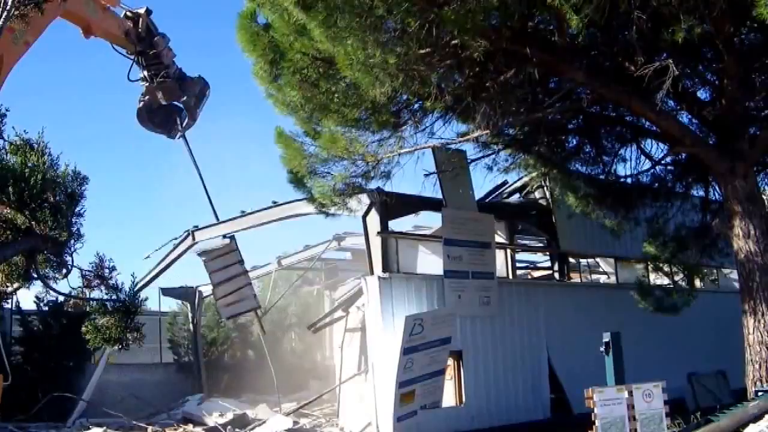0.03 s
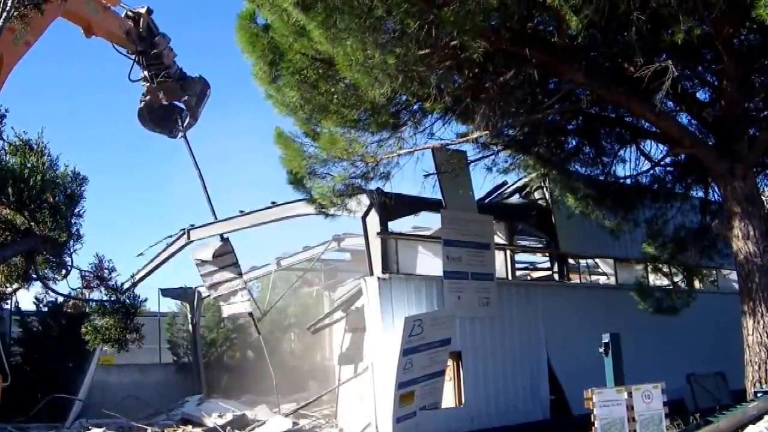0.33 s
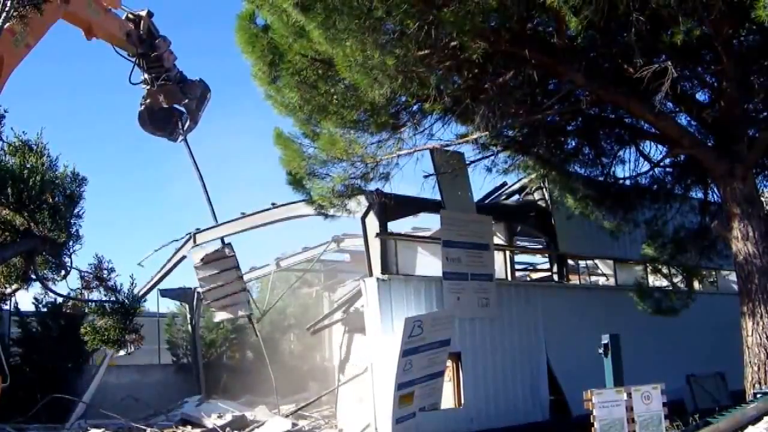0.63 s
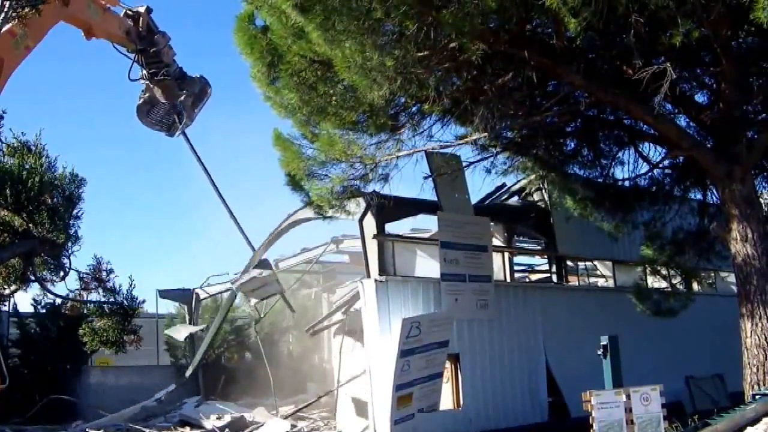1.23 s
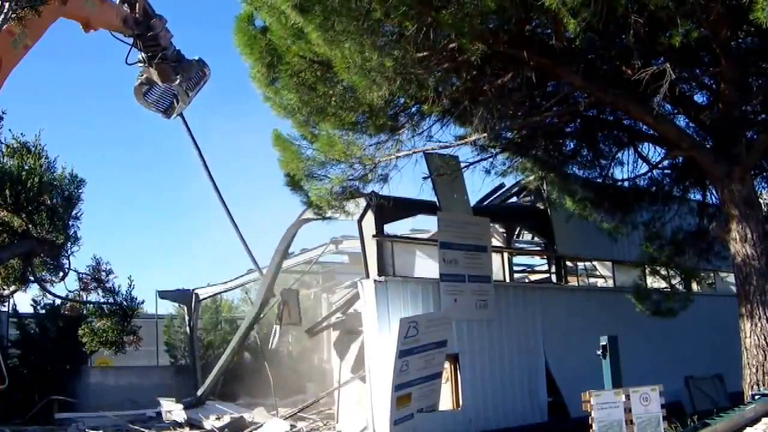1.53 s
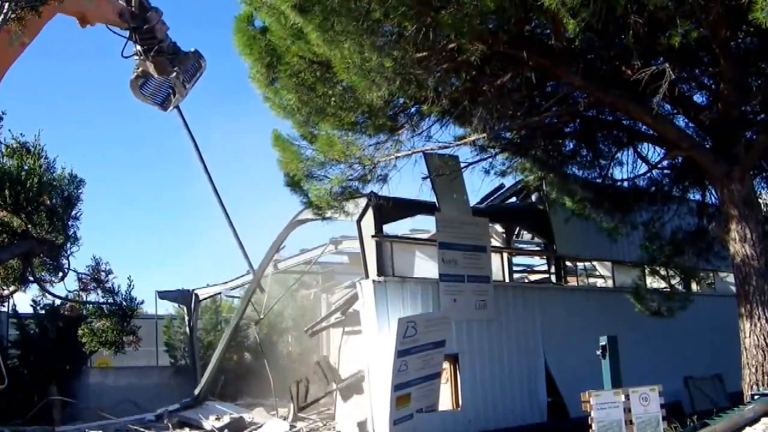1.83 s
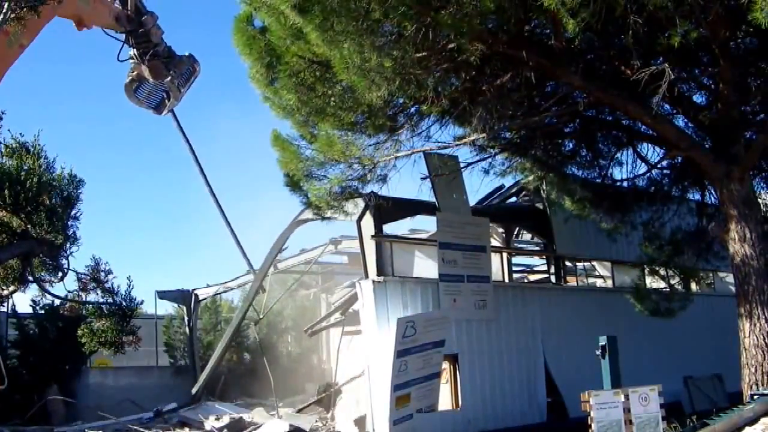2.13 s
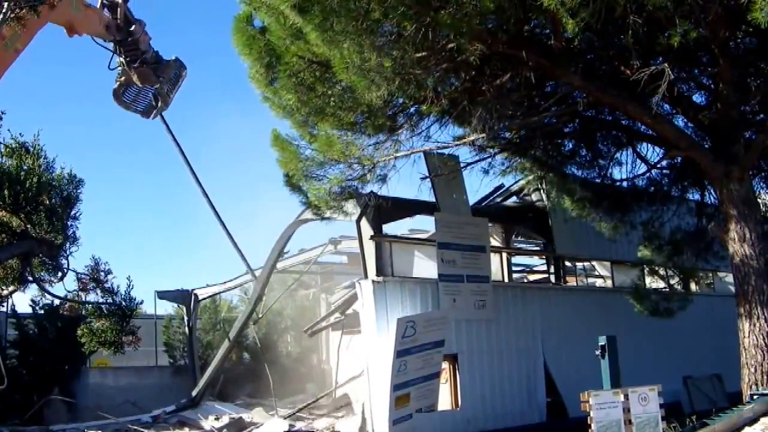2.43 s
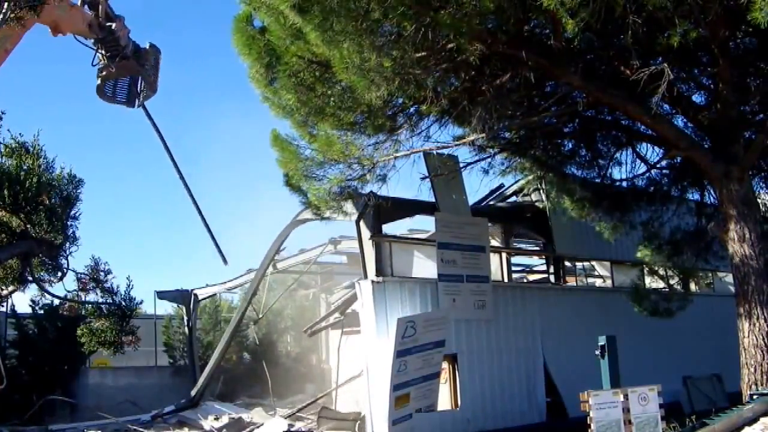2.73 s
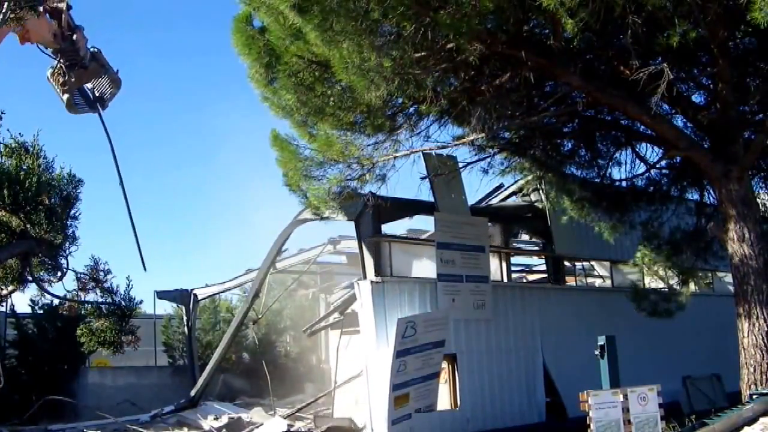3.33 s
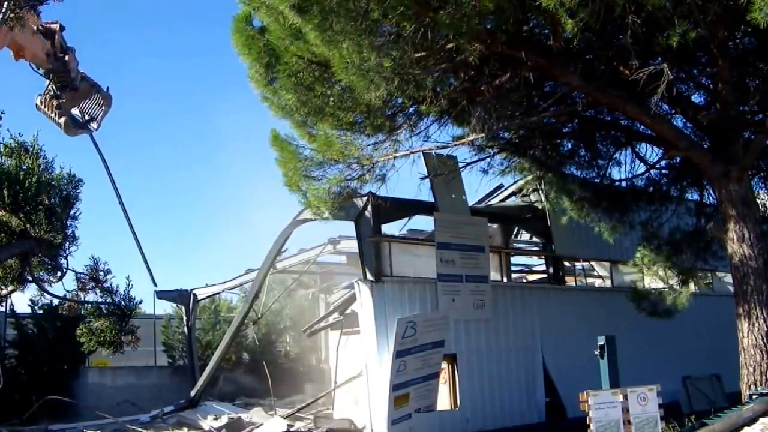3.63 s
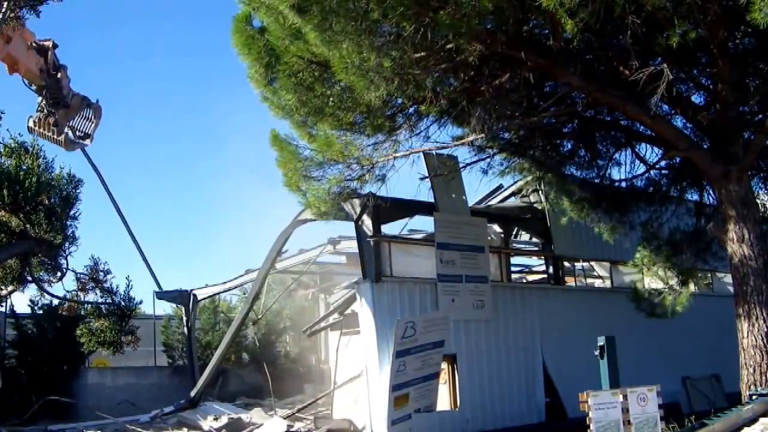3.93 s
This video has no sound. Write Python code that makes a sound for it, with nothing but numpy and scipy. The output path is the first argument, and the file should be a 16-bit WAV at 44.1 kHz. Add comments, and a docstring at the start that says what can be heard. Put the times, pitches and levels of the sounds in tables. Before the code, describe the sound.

An excavator tears down a shed outdoors, its diesel engine roaring under a hydraulic whine. Sheeting and rubble crash and clatter, heaviest midway, with brief steel squeals, then thin out. A small camera microphone picks up short echoes.

```python
"""A diesel roars under the whine of its hydraulic pump: an excavator is pulling the steel frame off a shed,
outdoors. Rubble pours down as thousands of tiny knocks, sheeting and masonry crash in bursts of fragments,
brittle pieces snap, and steel squeals where it drags and rings where it is struck. The collapse echoes
round the yard. A small camera microphone colours everything; its gain control ducks the engine at the
loud crashes and lets it swell back slowly."""
import sys
import numpy as np
from scipy import signal
from scipy.fft import rfft, irfft
from scipy.io import wavfile
from scipy.ndimage import uniform_filter1d

SR = 44100
rng = np.random.default_rng(int(sys.argv[2]) if len(sys.argv) > 2 else 0)


def wav_out(sig):
    """Save sig, one row per channel (or a flat mono array), as 16-bit PCM at SR to the path in sys.argv[1]."""
    wavfile.write(sys.argv[1], SR, np.round(np.clip(np.atleast_2d(sig).T, -1, 1) * 32767).astype(np.int16))


N = 176400
T = np.arange(N) / SR
CYCLE_HZ, SPEED_WANDER = 50.28, 0.0029  # engine cycle rate and its relative wander


def amp(db):
    """Decibels to gain."""
    return 10 ** (np.asarray(db) / 20)


def unit(x):
    """Scales to rms 1."""
    return x / np.sqrt(np.mean(x ** 2) + 1e-20)


def at_hz(points, hz):
    """Reads a curve on a log-frequency axis."""
    f, value = np.transpose(points)
    return np.interp(np.log(hz + 1), np.log(f + 1), value)


def fader(points):
    """Level in dB across the scene, ramping from point to point."""
    return np.interp(T, *np.transpose(points))


def add(mix, s, sound):
    """Mixes a sound in at s seconds."""
    part = mix[max(round(s * SR), 0):][:len(sound)]
    part += sound[:len(part)]


def colour(x, eq, size=4096):
    """Minimum-phase EQ of unit energy: the curve sets the tone, its levels are only relative."""
    log_gain = np.log(amp(at_hz(eq, abs(np.fft.fftfreq(size, 1 / SR)))))
    taps = np.fft.ifft(np.exp(np.conj(signal.hilbert(log_gain)))).real[:size // 2]
    return signal.oaconvolve(x, taps / np.linalg.norm(taps))[:len(x)]


def drift(hz):
    """Slow random modulation of rms 1, up to the given rate."""
    rolloff = 1 + (np.fft.rfftfreq(N, 1 / SR) / hz) ** 4
    return unit(irfft(rfft(rng.standard_normal(N)) / rolloff, N))


def diesel(phase, firing_depth=0.027, drone_hz=101):
    """A fluttering roar that pulses faintly with the firings, over engine orders and a low drone."""
    # tone of the roar: f/Hz, level/dB
    roar_eq = [(25, 9), (60, 13), (130, 6.5), (300, 7), (500, 9.5), (830, 4.5), (1200, -1), (2500, -1.5),
               (4300, -1), (7000, -0.5), (11000, 1.5), (16000, 0.5)]
    # engine harmonics: multiple of the cycle rate, level/dB
    orders = [(3, -69.5), (5, -39.5), (6, -37.5), (9, -46.5), (11, -52), (12, -41), (14, -42), (20, -45.5),
              (24, -46.5)]
    firing = rng.standard_normal(N) * (1 + firing_depth * np.cos(2 * phase))
    roar = colour(firing, roar_eq) * amp(-16.5 + 0.3 * drift(hz=35))
    hum = sum(amp(db + 2 * drift(hz=6.2)) * np.sin(order * phase + 2 * np.pi * rng.random())
              for order, db in orders)
    drone = amp(-24.5 + drift(hz=13)) * np.sin(phase * drone_hz / CYCLE_HZ)
    return roar + np.sqrt(2) * (hum + drone)


def pump(phase, order=10):
    """The hydraulic pump whines at a multiple of the engine's rate, swelling and flickering."""
    # swell of the whine: t/s, level/dB
    swell = [(0, -25.5), (.45, -37), (.78, -26), (1.1, -33.5), (1.9, -30.5), (2.3, -28), (2.85, -31.5),
             (3.5, -36), (4, -33)]
    return np.sqrt(2) * amp(fader(swell) + 2.2 * drift(hz=37)) * np.sin(order * phase)


def whistle(hz, width_hz):
    """Noise in a narrow resonance that follows a pitch curve."""
    r = np.exp(-np.pi * width_hz / SR)
    noise = rng.standard_normal(N) + 1j * rng.standard_normal(N)
    waver = signal.lfilter([1], [1, -2 * r, r * r], noise)[-len(hz):]
    return unit((waver * np.exp(2j * np.pi * np.cumsum(hz) / SR)).real)


def valve(hz=4170):
    """A hydraulic valve whistles thinly on one pitch."""
    # swell of the whistle: t/s, level/dB
    swell = [(0, -35), (3.2, -39), (3.62, -32), (3.85, -43.5), (4, -43)]
    return amp(fader(swell)) * whistle(np.full(N, hz), width_hz=45)


def fragments(per_s, count=48, size=1536, spread_db=3.5, ring_t60=0.031, crunch_s=0.0016):
    """A dense train of knocks of uneven size, each on one of many pieces that crunch and ring briefly."""
    strength = amp(spread_db * np.minimum(rng.exponential(1, N), 5))
    knocks = strength * rng.choice([-1, 1], N) * (rng.random(N) < per_s / SR)
    piece = rng.integers(0, count, N)
    out, t = np.zeros(N), T[:size]
    for k in range(count):
        hz = 450 * 16 ** rng.random((4, 1))  # four modes within four octaves
        ring = (np.sin(2 * np.pi * hz * t) * np.sqrt(hz)).sum(0) * amp(-60 * t / ring_t60)
        crunch = rng.standard_normal(size) * np.exp(-t / crunch_s)
        grain = 0.52 * ring / np.linalg.norm(ring) + 0.45 * crunch / np.linalg.norm(crunch)
        grain[0] += .5  # contact click
        out += signal.oaconvolve(knocks * (piece == k), grain)[:N]
    return unit(out)


def rubble():
    """Small debris pours down in clumps."""
    # surges of the pour: t/s, level/dB
    pour = [(0, -22), (.18, -25), (.33, -14), (.44, -15), (.6, -20), (.78, -21.5), (1.0, -15),
            (1.13, -22.5), (1.24, -17), (1.3, -18.5), (1.42, -13), (1.55, -2), (1.7, -8.5), (1.87, -4.5),
            (2.05, -11), (2.18, -7.5), (2.3, -9), (2.42, -11), (2.58, -22.5), (2.82, -17), (3.2, -37.5),
            (3.75, -28.5), (3.9, -21)]
    # tone of the debris: f/Hz, level/dB
    debris_eq = [(30, -3), (150, -5.5), (400, -4.5), (800, 0), (1200, 0.5), (1900, 0), (3200, 3),
                 (4500, 2.5), (7000, 1.5), (11000, 3), (16000, 4.5)]
    return colour(fragments(per_s=3200), debris_eq) * amp(fader(pour) + 2 * drift(hz=34.6))


def crashes(size=11025, rise_s=0.0018, fall_s=.011, weight_hz=600, bright_hz=3420):
    """Each crash is a crack and a burst of fragments that holds and dies; heavy pieces sound lower."""
    # sheeting and masonry coming down: t/s, level/dB, hold/s, weight/dB, brightness/dB
    hits = [(.195, -13.5, 0.031, 6.5, 1.5), (.301, -7.5, 0.034, -2, -6), (0.359, -5.5, 0.024, -1, -3.5),
            (0.405, -6.5, 0.028, 1.5, -2.5), (0.849, -7.5, 0.017, 6, -7), (.899, -12, 0.0054, -2, 0),
            (.992, -18, .015, 7, 16), (1.085, -14.5, 0.005, 0, 13), (1.162, -4, 0.011, 6.5, -3.5),
            (1.183, -4.5, 0.015, 4.5, -2.5), (1.235, -11, 0.034, 7.5, -6), (1.338, -10.5, .012, -5, -4),
            (1.352, -5, 0.015, -1, -2.5), (1.374, -11, .008, -3, -20.5), (1.435, -10, 0.0097, 0, -6),
            (1.457, -2.5, .014, 8.5, -8), (1.482, -3, 0.021, 8, 2), (1.526, -5, 0.039, 12.5, 19),
            (1.612, -5, 0.0089, 14, -2), (1.653, -2, 0.018, 5, 3.5), (1.742, -4.5, .005, 3, -1),
            (1.761, 7, 0.0083, 4, 1.5), (1.801, -1.5, 0.035, -11, 4), (1.856, -2.5, 0.0043, -6, -17),
            (1.91, 7, 0.0093, -14, -4), (1.923, 7, 0.03, -12.5, 2), (1.967, 1, 0.009, 3, 2),
            (2.103, -3.5, 0.006, -1, 11), (2.132, -1.5, 0.0035, 12, 5), (2.24, -5, 0.037, 2, 7),
            (2.278, -5, 0.031, -4, 12), (2.349, -10, 0.037, 9, 10), (2.438, -8.5, .012, -3, 4),
            (2.468, -11, 0.0072, 1, 11), (2.697, -6, 0.022, 3, 2.5), (2.719, -7, 0.033, 0.5, 4),
            (3.832, -11, 0.015, -1, -2)]
    # tone of the sheeting: f/Hz, level/dB
    sheeting_eq = [(30, -14), (150, -13.5), (400, -1.5), (800, -2), (1400, 1), (2500, 3), (4200, 1.5),
                   (5600, 5), (7000, -0.5), (11000, 4), (16000, -13)]
    out, t, breakage = np.zeros(N), T[:size], fragments(per_s=5000)
    lowpass = signal.butter(4, 5000, fs=SR, output="sos")
    for s, db, hold_s, weight_db, bright_db in hits:
        envelope = np.minimum(t / rise_s, 1) * np.exp(-np.maximum(t - hold_s, 0) / fall_s)
        burst = breakage[rng.integers(N - size):][:size] * envelope
        burst[round(rise_s * SR / 2)] += 6.8  # the crack, halfway up the attack
        weight = [(weight_hz / 2, weight_db / 2), (weight_hz, weight_db), (2 * weight_hz, 0)]
        sheen = [(bright_hz / 2, 0), (bright_hz, bright_db),
                 (1.73 * bright_hz, bright_db), (3 * bright_hz, 0)]
        burst = colour(colour(burst, sheeting_eq), weight + sheen)
        body = signal.sosfilt(lowpass, burst)  # the body sets the level, the top end rides on it
        body_rms = np.sqrt(np.sum(body ** 2) / SR / (hold_s + fall_s / 2))
        add(out, s, amp(db) * burst / (2 * body_rms))
    return out


def snaps(size=2205, rise_s=0.0052, band_hz=(6100, 10600)):
    """Short, bright cracks of brittle board and glass."""
    # pieces snapping: t/s, level/dB ahead of the band-pass
    cracks = [(0.214, -8), (1.161, -10), (1.433, -6), (1.653, 4), (2.132, -13), (2.295, 5), (2.346, -3),
              (2.381, -5), (2.437, -2), (2.699, -4), (3.831, -4.5)]
    out, t = np.zeros(N), T[:size]
    bandpass = signal.butter(2, band_hz, "band", fs=SR)
    envelope = t / rise_s * np.exp(1 - t / rise_s)
    for s, db in cracks:
        add(out, s, amp(db) * signal.lfilter(*bandpass, rng.standard_normal(size) * envelope))
    return out


def squeals():
    """The frame drags, steel on steel, in short squeals that fall in pitch."""
    # drags: t/s, length/s, start f/Hz, end f/Hz, level/dB
    drags = [(0.406, 0.03, 5500, 4900, -11.5), (.89, .19, 1847, 1760, -26.5), (1.224, .05, 1500, 1250, -31),
             (1.528, 0.22, 4045, 3590, -17)]
    out = np.zeros(N)
    for s, length, from_hz, to_hz, db in drags:
        progress = np.linspace(0, 1, int(length * SR))
        arch = np.sqrt(4 * progress * (1 - progress))
        add(out, s, amp(db) * arch * whistle(from_hz + (to_hz - from_hz) * progress, width_hz=170))
    return out


def clanks():
    """Struck steel parts ring in fast-dying modes."""
    # strikes: t/s, modes as (f/Hz, level/dB, t60/s)
    strikes = [(.899, [(1824, -5, 0.052)]), (1.527, [(501, -1.5, 0.082), (580, -6.5, 0.1)]),
               (2.438, [(2350, -7.5, 0.066)]), (2.65, [(5900, -17, .1), (7060, -16, .16), (9502, -8, 0.12),
               (10800, -15, .12)]), (3.833, [(1203, -23.5, 0.22), (3068, -12.5, 0.051), (4199, -15, 0.15),
               (4800, -14, .05), (11810, -10, .06)])]
    out, t = np.zeros(N), T[:SR // 2]
    for s, modes in strikes:
        add(out, s, sum(amp(db - 60 * t / t60) * np.sin(2 * np.pi * hz * t) for hz, db, t60 in modes))
    return out


def yard(x, size=256, build_s=.015):
    """Scattered echoes from walls and trees, the treble dying first."""
    # decay of the echoes: f/Hz, t60/s
    decay = [(100, 0.43), (1000, 0.42), (4000, 0.32), (12000, 0.2)]
    hz, t, noise = signal.stft(rng.standard_normal(SR // 2), SR, nperseg=size)
    envelope = amp(-60 * t / at_hz(decay, hz)[:, None]) * np.minimum(t / build_s, 1)
    tail = signal.istft(noise * envelope, SR, nperseg=size)[1]
    return signal.fftconvolve(x, tail / np.linalg.norm(tail))[:N]


def scene():
    """The dry machine and the echoing collapse, in mono."""
    collapse = rubble() + crashes() + snaps() + squeals() + clanks()
    phase = 2 * np.pi * np.cumsum(CYCLE_HZ * (1 + SPEED_WANDER * drift(hz=5.25))) / SR
    machine = diesel(phase) + pump(phase) + valve()
    return np.tile(machine + collapse + amp(-10) * yard(collapse), (2, 1))


def record(dry, limit_db=-14, detect_s=0.013, recover_db_per_s=13, start_duck_db=4, top_hz=15720):
    """Microphone colour, gain control that ducks at once and recovers slowly, then a steep high cut."""
    # response of the small microphone: f/Hz, level/dB
    mic_eq = [(30, -28), (100, -22), (200, -14), (300, -9), (400, -2.5), (500, 1), (600, -0.5), (700, -6.5),
              (830, -11), (930, -6), (1050, 4.5), (1220, 2.5), (1500, -4.5), (1900, -3), (2500, -6.5),
              (3300, -3), (4300, 0.5), (4900, -3.5), (5600, -11), (6300, -15.5), (7000, -16.5), (7700, -22),
              (9000, -28), (11000, -27), (13000, -37.5), (15500, -47)]
    x = colour(dry.mean(0), mic_eq)
    level_db = 10 * np.log10(abs(uniform_filter1d(x ** 2, int(detect_s * SR))) + 1e-12)
    recovery_db = recover_db_per_s * T
    # the gain is still recovering as the scene opens
    held_db = np.maximum.accumulate(np.maximum(level_db - limit_db + recovery_db, start_duck_db))
    duck_db = np.maximum(held_db - recovery_db, 0)
    x = x * amp(-uniform_filter1d(duck_db, size=64))
    high_cut = signal.firwin(511, top_hz, window=("kaiser", 9), fs=SR)
    return np.tile(signal.oaconvolve(x, high_cut, "same"), (2, 1))


dry = scene()
out = record(dry)
wav_out(out)
```